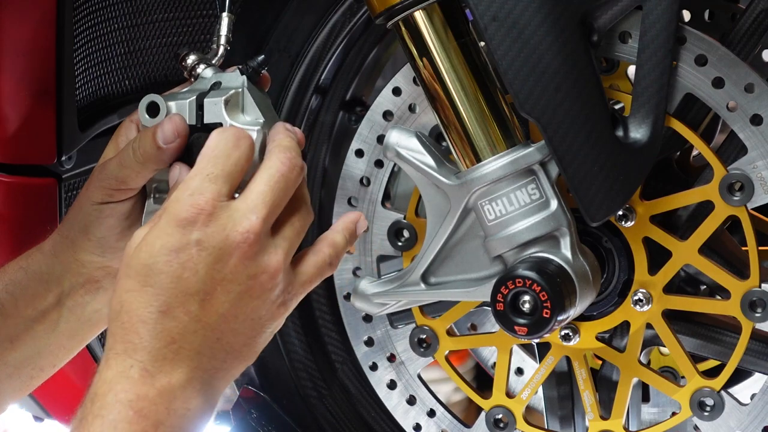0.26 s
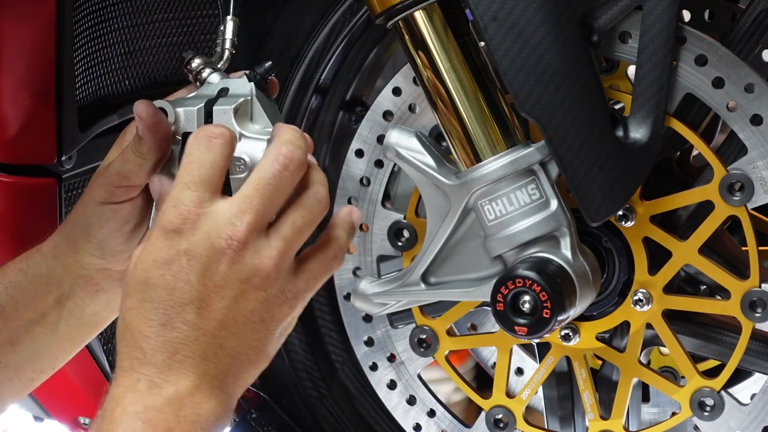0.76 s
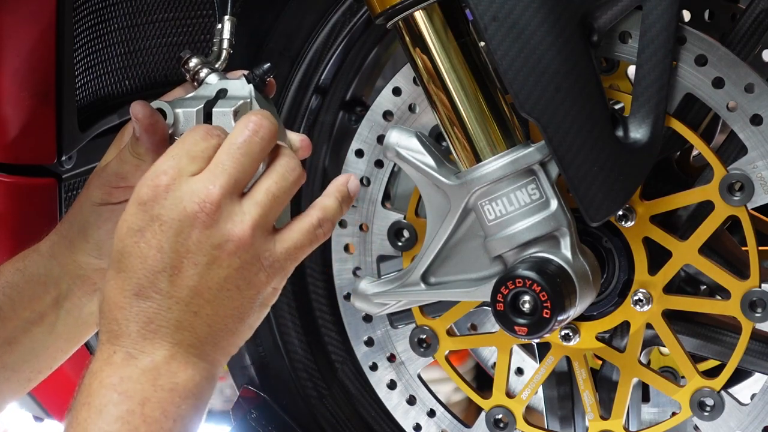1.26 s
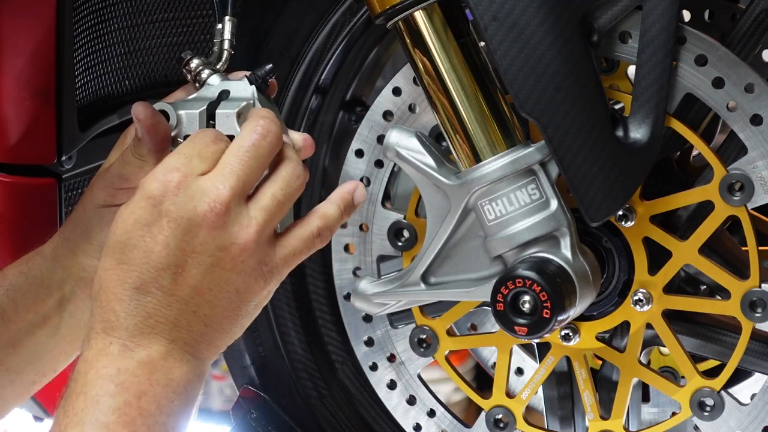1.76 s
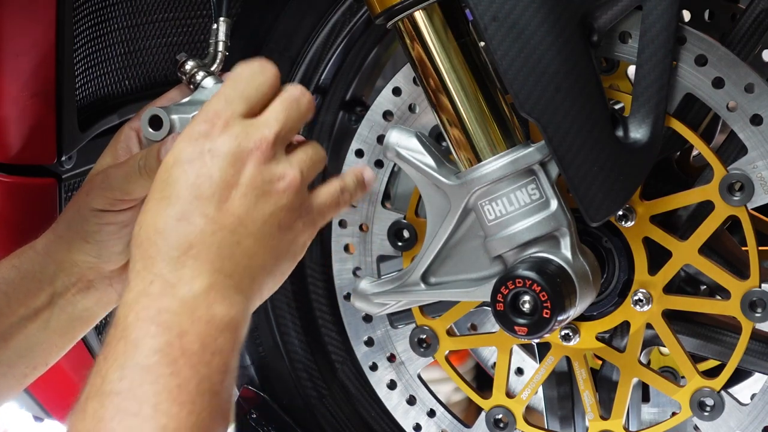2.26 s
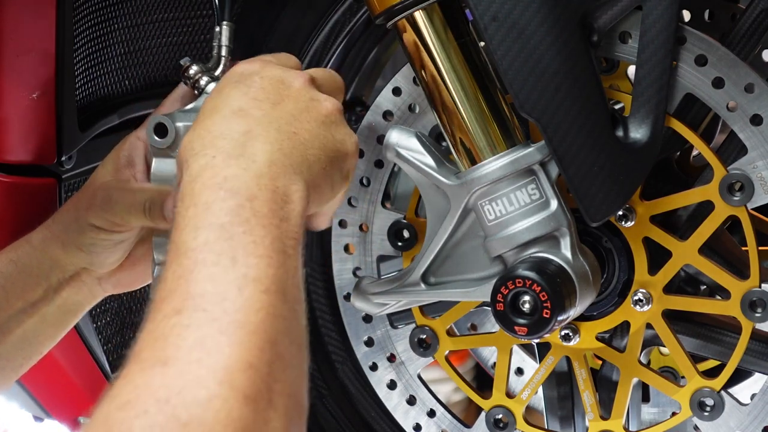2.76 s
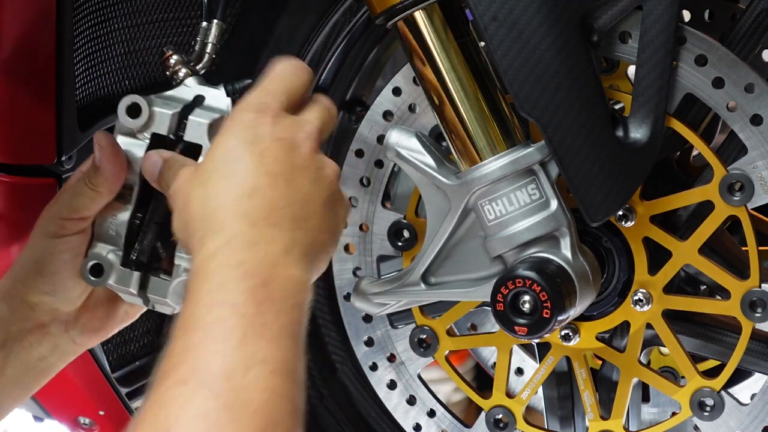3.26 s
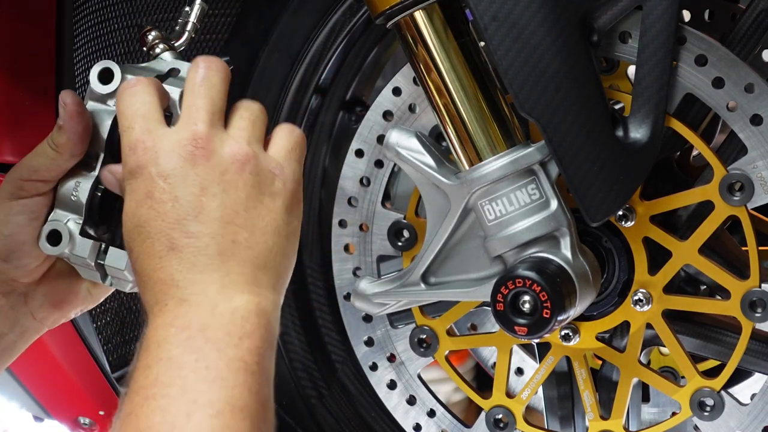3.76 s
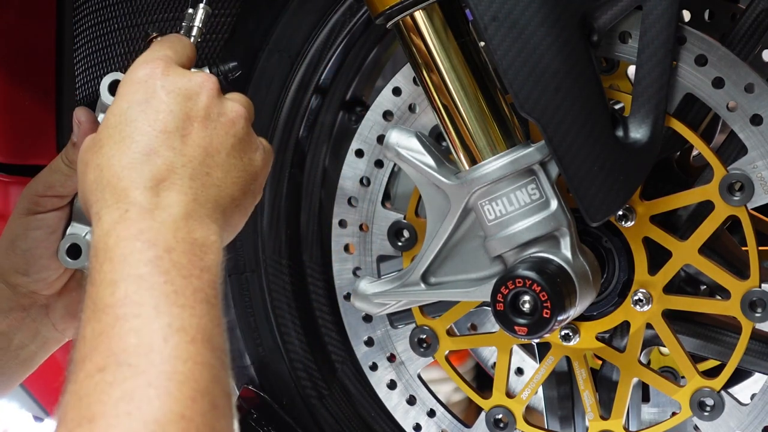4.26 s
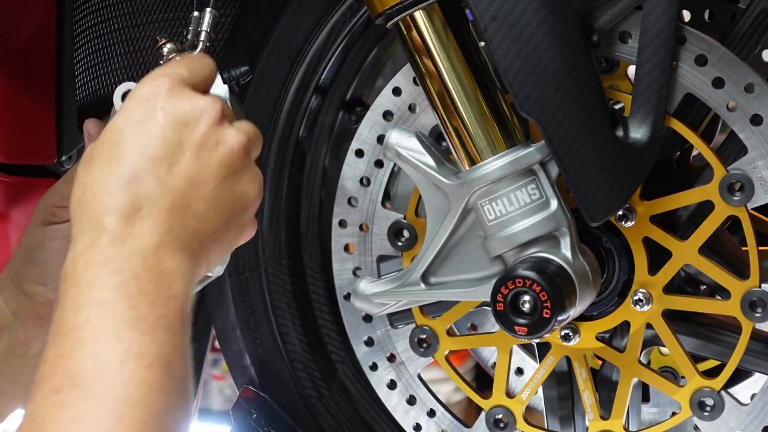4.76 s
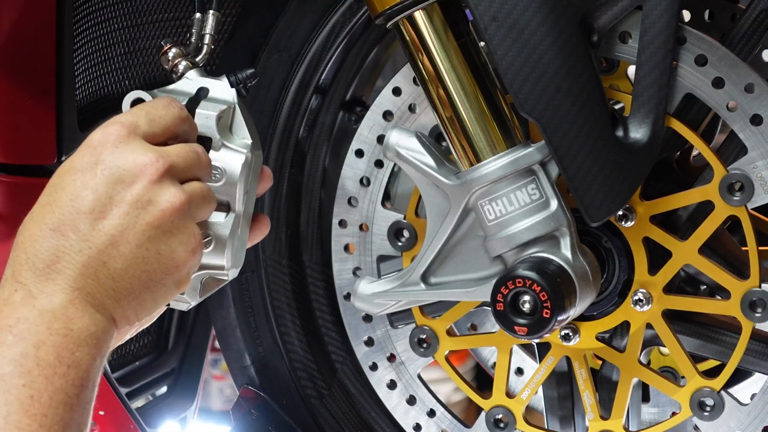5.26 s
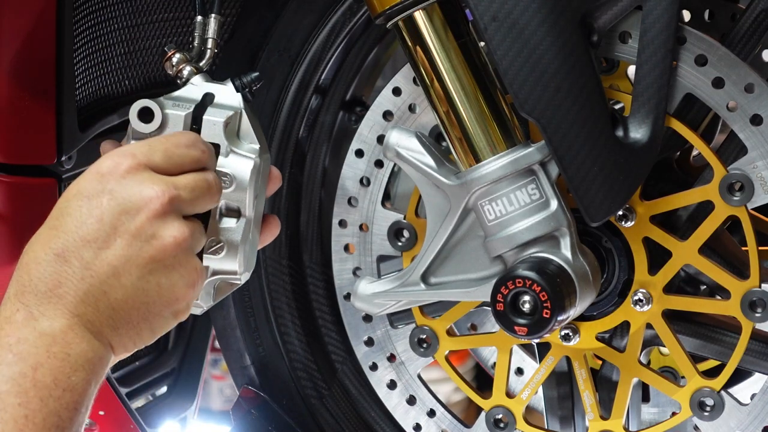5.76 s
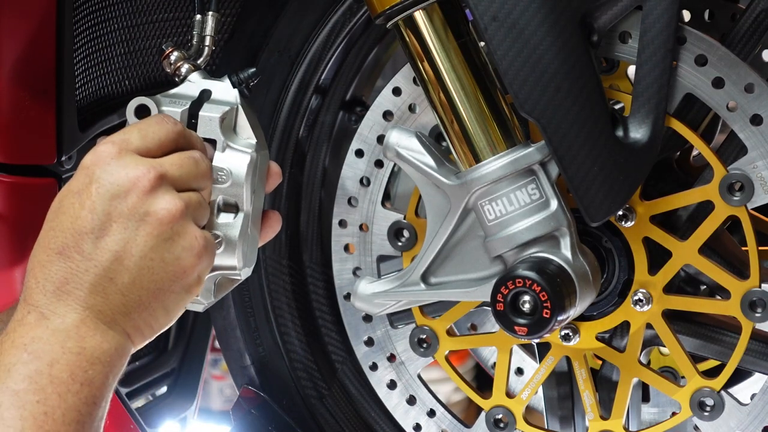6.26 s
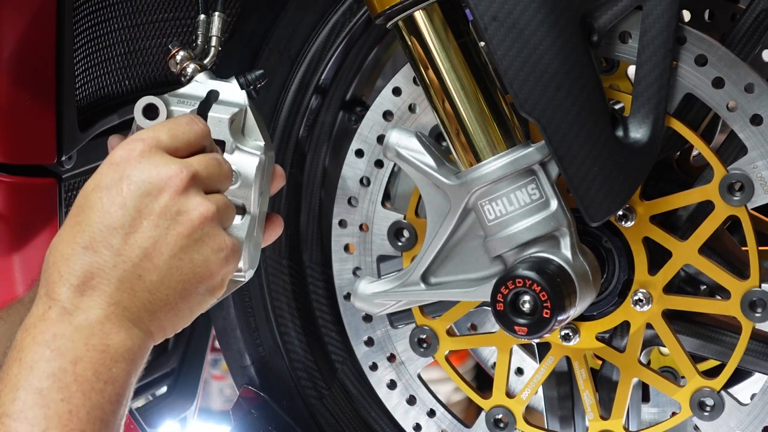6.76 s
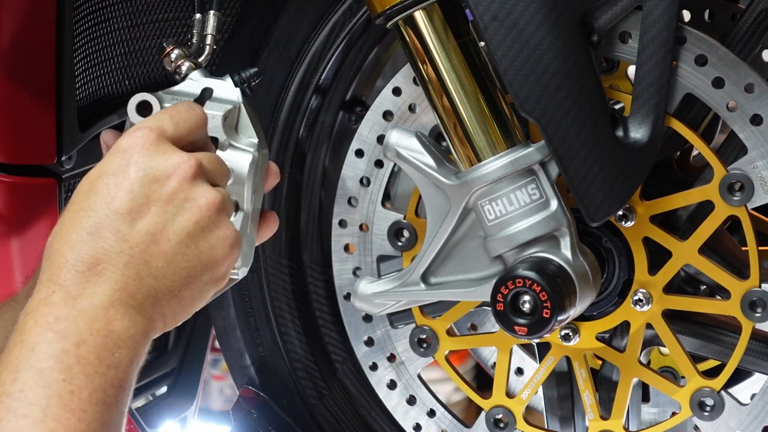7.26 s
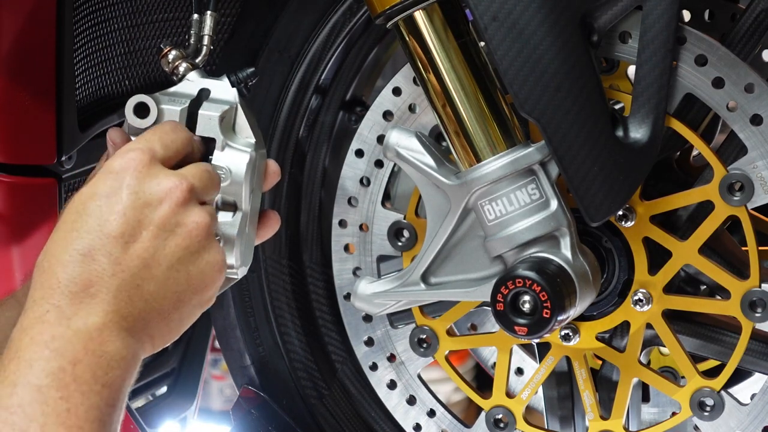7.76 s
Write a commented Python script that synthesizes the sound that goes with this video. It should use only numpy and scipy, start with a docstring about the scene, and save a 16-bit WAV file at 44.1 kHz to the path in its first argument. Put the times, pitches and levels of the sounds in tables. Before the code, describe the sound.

Small metal brake pad plates clack and clink against a metal caliper in a quiet garage, ending in one very loud, sharp snap.

```python
"""Fitting motorcycle brake pads

Pads are fitted by hand into a caliper in a quiet garage: blows of pad and retaining spring ring banks of modes.
Finger rubs are band-passed grains; air is shaped noise, and a faint low drone is a wavering sine.
Near the end a pad snaps home, a dispersed resonant impulse hard enough to overload the microphone.
"""
import sys
import numpy as np
from scipy import signal
from scipy.fft import rfft, irfft
from scipy.io import wavfile

SR = 44100
rng = np.random.default_rng(int(sys.argv[2]) if len(sys.argv) > 2 else 0)


def int16_out(signal):
    """Quantize to a 16-bit WAV file."""
    q = np.round(np.clip(np.atleast_2d(signal).T, -1, 1) * 32767)
    wavfile.write(sys.argv[1], SR, q.astype(np.int16))


N = 353682  # samples


def amp(db):
    """Decibels to gain."""
    return 10 ** (np.asarray(db) / 20)


def evened(x):
    """Scales to unit rms."""
    return x / np.sqrt(np.mean(x ** 2) + 1e-20)


def unit(rows):
    """Scales each row so that its first 12.5 ms hold the energy of 10 ms at unit rms."""
    energy = np.sum(rows[:, :SR // 80] ** 2, axis=1, keepdims=True)
    return rows / np.sqrt(energy * 100 / SR + 1e-20)


def read(points, hz):
    """Reads a spectrum on a log-frequency axis."""
    f, value = np.transpose(points)
    return np.interp(np.log(hz + 1), np.log(f), value)


def columns(rows):
    """Splits an event table into upright columns."""
    return np.transpose(rows)[:, :, None]


def add(mix, start_s, sound):
    """Mixes a sound in at start_s, cut off at the end of the mix."""
    part = mix[max(round(start_s * SR), 0):][:len(sound)]
    part += sound[:len(part)]


def band(x, lo_hz, hi_hz, order=3):
    """Causal band-pass."""
    edges_hz = [lo_hz, min(hi_hz, SR / 2 - 1000)]
    return signal.sosfilt(signal.butter(order, edges_hz, "band", fs=SR, output="sos"), x)


# still-air spectrum, relative: (frequency [Hz], density [dB per Hz])
AIR_SPECTRUM = [(15, -54), (25, -31), (43, -5), (92, -2), (293, -13.5), (317, -14), (439, -14.5),
                (503, -13), (818, -18), (1100, -19), (1650, -19.5), (1790, -19.5), (4740, -25.5),
                (5570, -23), (16000, -31)]
AIR_RMS_DB = -59


def air():
    """Steady room rumble and hiss: noise shaped in the spectrum."""
    hz = np.fft.rfftfreq(N, 1 / SR)
    spectrum = rfft(rng.standard_normal(N)) * amp(read(AIR_SPECTRUM, hz))
    return amp(AIR_RMS_DB) * evened(irfft(spectrum, N))


# faint low drone, one list per passage: (time [s], frequency [Hz], level [dB])
DRONE_PATHS = [
    [(.27, 132, -89), (.37, 137, -54.5), (.5, 137.5, -69), (.67, 141.2, -58.5), (.85, 144, -70)],
    [(2.42, 93.7, -70), (2.6, 93.4, -58.5), (2.95, 87.7, -60.5), (3.25, 93.6, -58.5), (3.5, 93.5, -69),
     (3.8, 94, -62.5), (4.35, 94, -63), (4.6, 93, -69)],
]


def drone(waver_rad):
    """A low sine comes and goes, its phase wandering at random."""
    out = np.zeros(N)
    for path in DRONE_PATHS:
        s, hz, db = np.transpose(path)
        t = np.arange(s[0], s[-1], 1 / SR)
        wobble = np.interp(t, np.linspace(s[0], s[-1], 24), rng.standard_normal(24))
        phase = 2 * np.pi * np.cumsum(np.interp(t, s, hz)) / SR + waver_rad * wobble
        tone = np.sqrt(2) * np.sin(phase)
        add(out, s[0], tone * amp(np.interp(t, s, db)) * signal.windows.tukey(len(t), .1))
    return out


# garage ring time: (frequency [Hz], t60 [s])
ROOM_T60 = [(200, 0.15), (800, 0.3262), (2000, 0.34), (5000, 0.3474), (8000, 0.3054), (15000, 0.23)]
# tail colour: (frequency [Hz], level [dB])
ROOM_COLOUR = [(200, -7.5), (900, 7), (2000, 4), (3500, 3.5), (5000, -3), (7000, -2), (9000, 2),
               (12500, -8), (16000, -14.5)]


def garage(x, build):
    """Dense reflections build up from the wheel and walls; their decay time varies with frequency."""
    size = SR * 3 // 5
    colour = amp(read(ROOM_COLOUR, np.fft.rfftfreq(size, 1 / SR)))
    tail = irfft(rfft(rng.standard_normal(size)) * colour, size)
    hz, t, bins = signal.stft(tail, SR, nperseg=256)
    decay = amp(-60 * t / read(ROOM_T60, hz)[:, None])
    tail = signal.istft(bins * decay, SR, nperseg=256)[1][:size]
    tail *= amp(np.interp(np.arange(size) / SR, *np.transpose(build), left=-100))
    return signal.fftconvolve(x, tail / np.sqrt(SR / 50))[:N]


# finger slides: (start [s], length [s], level before fades [dB], pitch that places the band [Hz])
SLIDES = [(0.204, 0.16, -60, 3500), (0.495, 0.058, -58, 7000), (1.046, 0.06, -61, 2200),
          (2.266, 0.05, -49, 4500), (2.88, 0.58, -72, 4580), (3.281, 0.12, -74, 7000),
          (3.694, 0.32, -57.5, 3960), (3.976, 0.61, -65, 2000), (4.95, 0.32, -60, 8100),
          (7.785, 0.11, -61.5, 2500)]


def slides(grain_db):
    """Pad slides under the fingers: rough faces catch and let go in a stream of tiny grains."""
    out = np.zeros(N)
    grains = rng.standard_normal(N) * amp(grain_db * np.minimum(rng.exponential(1, N), 6))
    for s, length_s, db, hz in SLIDES:
        rub = grains[round(s * SR):round((s + length_s) * SR)]
        stroke = evened(band(rub, hz / 8.3, hz * 1.34, order=2))
        add(out, s, amp(db) * stroke * signal.windows.tukey(len(stroke), .6))
    return out


# caliper body, plate bending, plate twisting, clink, ping, tick, fizz: (low edge [Hz], high edge [Hz])
REGISTERS = [(680, 2100), (2100, 3050), (3100, 3800), (4000, 6400), (6500, 7650), (7700, 9700),
             (9800, 16000)]
PIVOT_HZ, TILT_TOP_OCTAVES = 4000, 1.3  # further above the pivot, hardness adds no more


def drive(strength_db, hardness_db_per_octave):
    """Register levels before the kind's colour: a harder contact tilts the blow towards the treble."""
    octaves = np.log2(np.array(REGISTERS) / PIVOT_HZ).mean(axis=1)
    return strength_db + hardness_db_per_octave * np.minimum(octaves, TILT_TOP_OCTAVES)


def blows(s, levels_db, loose, contact_s, lead_hz, modes, crack_db, chatter_db, free_t60_s, detune_hz):
    """Short rattling contacts: a noise crack plus clear modes; a looser part has a purer, longer lead mode."""
    t = np.arange(SR // 4) / SR
    contact_s = np.maximum(contact_s, .0003) * np.ones_like(s)
    loose = np.clip(loose, 0, 1)
    rattle = np.exp(-t / contact_s) * (1 - np.exp(-t / (0.45 * contact_s)))
    grit = band(rng.standard_normal((len(s), len(t))) * rattle, 300, 10000, order=1)
    swell = 1 - np.exp(-t / (0.31 * contact_s))  # modes gather energy while the faces touch
    lead_decay = amp(-60 * t / (0.024 + free_t60_s * loose ** 2))
    lead = unit(swell * lead_decay * np.sin(2 * np.pi * lead_hz * t))
    chance = rng.standard_normal((len(s), len(modes), 3))
    sounds = 0
    for (lo, hi), level_db in zip(REGISTERS, columns(levels_db)):
        part = amp(crack_db) * (1 - loose) * unit(band(grit, lo, hi, order=4))
        for k, (hz, db, t60_s) in enumerate(modes):
            if lo <= hz < hi:
                phase, push, grip = columns(chance[:, k])  # grip retunes each mode per blow
                wave = np.sin(2 * np.pi * ((hz + detune_hz * grip) * t + phase))
                ring = unit(swell * amp(-60 * t / t60_s) * wave)
                part = part + amp(db + chatter_db * push) * ring
        share = loose * ((lo <= lead_hz) & (lead_hz < hi))
        blend = np.sqrt(1 - share) * unit(part) + np.sqrt(share) * lead
        sounds = sounds + amp(level_db) * unit(blend)
    out = np.zeros(N)
    for start_s, sound in zip(s[:, 0], sounds):
        add(out, start_s, sound)
    return out


# spring slips over an edge: (time [s], strength [dB], hardness [dB per octave], looseness [0-1],
# contact time constant [s], lead mode [Hz])
SPRING_CLICKS = [(1.44, -62.5, -1, 0.35, .0025, 5300), (1.758, -48, 5.5, 0.3, .0035, 4670),
                 (2.279, -50.5, -2, 0.3, .0021, 4610), (2.2832, -38, 2.5, 0, .0042, 4430),
                 (7.0425, -56, -1.5, 0.48, .0018, 4770), (7.2465, -71, -9, 0.2, .003, 1485),
                 (7.5224, -59, -2, 0.63, .0048, 4544), (7.578, -48, -4.5, 0.16, .0088, 4570),
                 (7.586, -31, 3, 0.11, .0089, 4580)]
# spring modes: (frequency [Hz], level [dB], t60 [s])
SPRING_MODES = [(803, -12.5, 0.1), (1541, 4, 0.071), (2395, 2.5, 0.042), (3540, 8, 0.025),
                (4470, -0.5, 0.028), (4628, 0, 0.038), (5180, -3, 0.02), (5680, -12, .01), (7330, 1, .025),
                (7400, -2, 0.051), (8380, 0, 0.033), (8450, -8, 0.018), (8750, -5.5, 0.032)]
# spring pressed against the pad, per register: (level [dB])
HELD_SPRING_DB = [-4.5, -3, -6.5, 1, -7, -4.5, -11]
# change for a free spring, mostly towards clink, per register: (level [dB])
LOOSE_SPRING_DB = [10.5, -20.5, -12, 28.5, 10.5, -21, -1]


def spring():
    """The retaining spring slips: a broad clack when pressed, a thin clink when free."""
    s, db, hardness, loose, contact_s, lead_hz = columns(SPRING_CLICKS)
    levels_db = drive(db, hardness) + HELD_SPRING_DB + loose * LOOSE_SPRING_DB
    return blows(s, levels_db, loose, contact_s, lead_hz, SPRING_MODES,
                 crack_db=1.0, chatter_db=0.0, free_t60_s=.15, detune_hz=5.3)


# modes of a pad in the caliper: (frequency [Hz], mean level [dB], t60 [s])
PAD_MODES = [(860, -1.5, 0.07), (1045, -10.5, 0.06), (1171, -2.5, 0.025), (1444, -0.5, 0.025),
             (1579, -1.5, 0.022), (1830, -3.5, 0.0067), (2450, -8, 0.024), (2520, 4, 0.036),
             (2717, 4.5, 0.017), (2863, 4, 0.052), (3368, -1, 0.029), (3490, -5.5, 0.12), (4320, -1, .03),
             (4720, 4, 0.016), (5030, 0, .015), (5530, 3.5, 0.0021), (7095, 10, 0.028), (7060, 5.5, 0.053),
             (7400, -9, 0.025), (8040, 3.5, 0.0048), (9200, -1.5, 0.025), (13400, -9, 0.05)]


def pad(s, levels_db, loose, contact_s, lead_hz):
    """Every touch of the pad rings the same modes, slightly retuned."""
    return blows(s, levels_db, loose, contact_s, lead_hz, PAD_MODES,
                 crack_db=3.5, chatter_db=3.0, free_t60_s=0.19, detune_hz=9.8)


# pad and hand on the caliper: (time [s], strength [dB], hardness [dB per octave], lead mode [Hz])
BUMPS = [(.095, -57.5, 0.5, 870), (.4849, -49.5, 0.5, 864), (1.742, -57.5, -3, 1240),
         (3.378, -57.5, 3, 2550), (4.065, -58, 1.5, 1030), (4.15, -57.5, -0.5, 1200),
         (4.235, -59, -1.5, 800), (4.361, -59, 0, 2780), (5.9894, -56.5, 0, 870), (6.6998, -52, -.5, 850),
         (7.246, -50, 3, 1485), (7.8507, -48, 2.5, 1480), (7.912, -63.5, -3.5, 1294)]
# cushioned push, mostly caliper body, per register: (level [dB])
BUMP_DB = [1, -9.5, -12.5, -13.5, -20.5, -27, -28]
BUMP_LOOSE, BUMP_CONTACT_S = 0.39, .005


def bumps():
    """Soft pushes that wake mainly the caliper body."""
    s, db, hardness, lead_hz = columns(BUMPS)
    return pad(s, drive(db, hardness) + BUMP_DB, BUMP_LOOSE, BUMP_CONTACT_S, lead_hz)


# light touches of the pad's edge: (time [s], strength [dB], hardness [dB per octave])
TICKS = [(.5268, -60, -3), (.5607, -66.5, 5), (1.975, -68, 0), (2.432, -70, 3), (2.9423, -64, 3.5),
         (3.215, -68, -6.5), (3.301, -70, 2), (4.9862, -53.5, -1.5), (5.217, -53.5, -2), (5.7424, -66.5, 0),
         (5.9031, -62, 1.5), (7.9385, -71, 9)]
# edge barely catching, per register: (level [dB])
TICK_DB = [-4, -5.5, -9, 3.5, 2, -4, -6.5]
TICK_LOOSE, TICK_CONTACT_S, TICK_LEAD_HZ = 0.067, 0.0023, 7200


def ticks():
    """The pad's edge catches lightly: short and bright."""
    s, db, hardness = columns(TICKS)
    return pad(s, drive(db, hardness) + TICK_DB, TICK_LOOSE, TICK_CONTACT_S, TICK_LEAD_HZ)


# pad against caliper: (time [s], strength [dB], hardness [dB per octave], flat-to-corner [0-1],
# looseness [0-1], contact time constant [s], lead mode [Hz])
KNOCKS = [(0.2429, -46.5, 6, 0.75, 0.07, 0.003, 2850), (0.26, -47.0, -0.5, 0.77, 0.2, 0.0043, 3000),
          (0.2784, -39.0, -1.5, 0.41, 0.01, 0.0067, 3000), (0.6155, -36.5, 1.5, 0.76, 0.41, 0.0044, 2900),
          (0.6895, -41.5, 2.0, 0.71, 0.28, 0.0049, 2730.0), (0.7343, -47.5, 0, 0.88, 0.27, 0.003, 2640),
          (0.868, -42.5, 3, 0.93, 0.35, 0.0022, 2620), (1.3714, -49.0, -1.5, 0.77, 0.21, 0.0078, 2700),
          (1.5075, -36, -1, 0.0, 0.24, 0.0016, 2460), (1.565, -45.5, -2, 0.27, 0.2, 0.0038, 2860.0),
          (1.6388, -53.5, -4.0, 0.59, 0.3, 0.0085, 2400.0), (3.4995, -48.5, 1, 0.3, 0.15, 0.0071, 2930),
          (3.5202, -35.0, 1.5, 0.29, 0.59, 0.0046, 2830.0), (3.616, -29, 6.5, 0.77, 0.56, 0.0036, 2830.0),
          (3.633, -36.5, 0, 0.24, 0.56, 0.0032, 2860), (3.7172, -34.0, 2.5, 0.28, 0.33, 0.0026, 2550),
          (3.9206, -54.5, -3.5, 0.34, 0.47, 0.0063, 2870.0), (4.0124, -55, -2.0, 0.7, 0.4, 0.0025, 2560),
          (4.123, -41, 3.5, 0.33, 0.27, 0.0041, 2630), (4.2294, -53.5, 5.5, 1.0, 0.16, 0.0011, 2840.0),
          (4.2952, -54, -1.5, 0.5, 0.08, 0.0042, 2730), (4.395, -48.0, -2, 0.45, 0.7, 0.0012, 2795),
          (4.4748, -53.5, -4, 0.58, 0.63, 0.0025, 2840.0), (4.8188, -28.5, 4, 0.11, 0.29, 0.0018, 2400),
          (5.0849, -49.5, -3, 0.53, 0.39, 0.002, 2300), (5.1552, -33.0, 1, 0.15, 0.16, 0.004, 2300),
          (5.4566, -48.5, -3, 0.29, 0.24, 0.0043, 2610), (6.0585, -33.5, 2.5, 0.89, 0.04, 0.0057, 2900.0),
          (6.066, -24.5, 7, 0.72, 0.23, 0.0066, 2846), (6.4658, -59.5, -4.5, 0.49, 0.4, 0.0038, 2470),
          (6.8285, -41.0, -4, 0.21, 0.33, 0.0051, 2810), (6.937, -41.5, -2.0, 0.96, 0.2, 0.0021, 2620.0),
          (7.0422, -42.5, 0, 0.43, 0.45, 0.0047, 2300)]
# firmly held pad landing flat, per register: (level [dB])
FLAT_PAD_DB = [-8.5, -4, 0.5, -5, -19, -21, -28.5]
# change for a corner hit, twist traded for ping, per register: (level [dB])
CORNER_DB = [6, -7.5, -14, -7.5, 13, 8.5, 4]
# change for a loose pad, free to bend and ping, per register: (level [dB])
LOOSE_PAD_DB = [-1.5, 20, -7, -1, 13, -17, -12]


def knocks():
    """The pad strikes the caliper, flat or on a corner, held firmly or loosely."""
    s, db, hardness, corner, loose, contact_s, lead_hz = columns(KNOCKS)
    levels_db = drive(db, hardness) + FLAT_PAD_DB + corner * CORNER_DB + loose * LOOSE_PAD_DB
    return pad(s, levels_db, loose, contact_s, lead_hz)


SNAP_S = 7.592  # pad slams into its seat


def jolt(db, decay_s):
    """The snap also shoves the whole caliper: a dull decaying noise push with no ring."""
    t, out = np.arange(SR // 10) / SR, np.zeros(N)
    push = evened(band(rng.standard_normal(len(t)), 170, 700, order=2))
    add(out, SNAP_S, amp(db) * np.exp(-t / decay_s) * push)
    return out


# seated-pad resonances, widened by clamping: (frequency [Hz], nominal width [Hz], level [dB])
SEAT_RESONANCES = [(900, 48, -19), (1237, 340, -22.5), (1720, 260, -6), (1934, 180, -9), (2160, 210, -3.5),
                   (2535, 220, -7), (2800, 180, -16), (3490, 120, -7), (4290, 640, -14.5), (4800, 82, -9.5),
                   (4870, 320, -1.5), (5790, 160, -2.5), (6740, 440, 1.5), (7000, 250, 2.5),
                   (7400, 170, -2), (8050, 370, -8), (8910, 380, -2), (9420, 64, -3), (10750, 2100, -15),
                   (12800, 2300, -13), (15000, 1550, -29)]


def snap(db, spread_s, skirt):
    """One hard impact rings the seated pad; the plate spreads its pitches out over a moment."""
    size = 8192
    f = np.fft.fftfreq(size, 1 / SR)
    power = sum(amp(level_db) ** 2 / (1 + (2 * (abs(f) - hz) / width_hz) ** 2) ** skirt
                for hz, width_hz, level_db in SEAT_RESONANCES)
    # minimum phase: the resonances ring only after the impact
    causal = np.exp(np.conj(signal.hilbert(.5 * np.log(power + 1e-10))))
    # delay grows with frequency, reaching spread_s at SR / 4
    dispersion = np.exp(-1j * np.pi * spread_s * f * abs(f) / (SR / 4))
    impulse = np.fft.ifft(causal * dispersion).real[None, :size // 2]
    out = np.zeros(N)
    add(out, SNAP_S, amp(db) * unit(impulse)[0])
    return out


# build-up and near walls: (time [s], level [dB])
ROOM_BUILD = [(.002, -28.5), (.008, 0), (0.017, -1), (0.021, -3.5), (.035, -2), (.06, -2.5)]
# snap reflections, mostly from farther walls: (time [s], level [dB])
FAR_BUILD = [(.002, -3.5), (.009, -11), (.016, -3), (0.022, 2.5), (.029, -3), (.037, 1), (.06, 0.5),
             (.1, 1)]


def scene():
    """Pad, spring and snap, each with its share of the room, over the quiet background."""
    plates = knocks() + ticks() + bumps()
    clicks = spring()
    slam = snap(db=-8.5, spread_s=0.000991, skirt=1.62) + jolt(db=-26.0, decay_s=0.0019)
    room = garage(amp(-3.5) * plates + amp(-3) * clicks, ROOM_BUILD) + garage(slam, FAR_BUILD)
    background = slides(grain_db=2.5) + air() + drone(waver_rad=0.24)
    return (plates + clicks + slam + room + background)[None]


EDGE_HZ = 16100


def record(dry):
    """The microphone input clips at 0.92; then a low-pass limits the band."""
    clipped = np.clip(dry, -.92, .92)
    lowpass = signal.firwin(255, EDGE_HZ, window=("kaiser", 8), fs=SR)
    return signal.oaconvolve(clipped, lowpass[None], "same")


dry = scene()
out = record(dry)
int16_out(out)
```